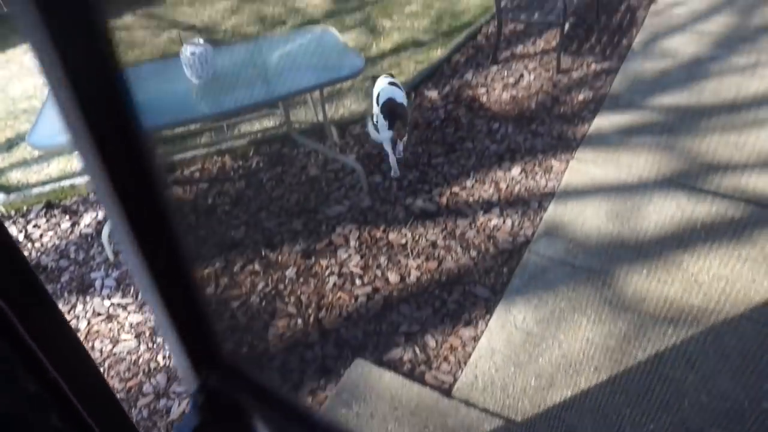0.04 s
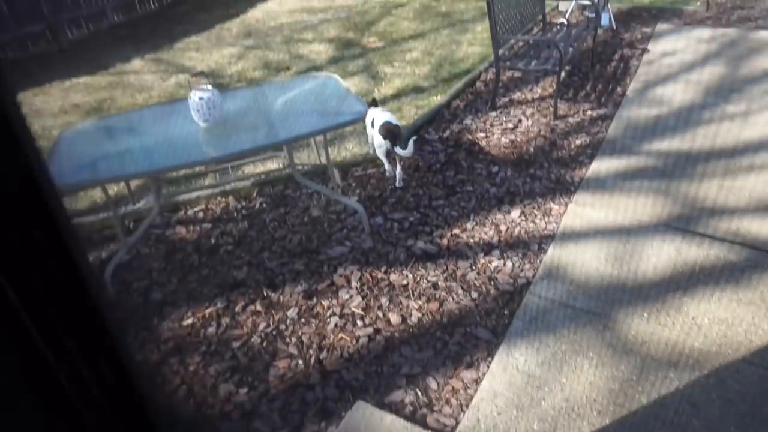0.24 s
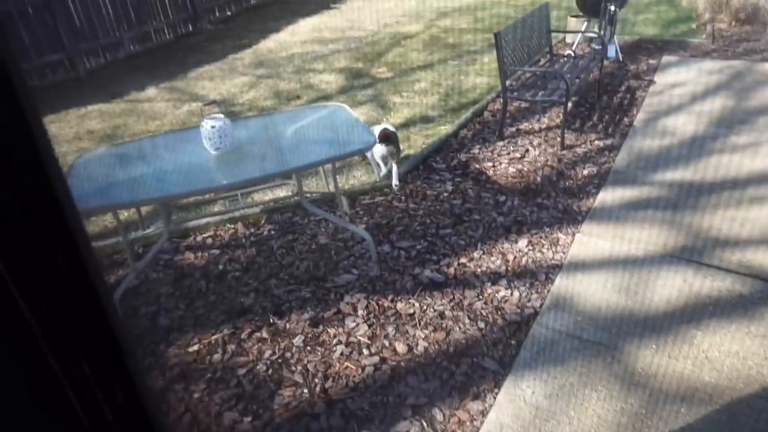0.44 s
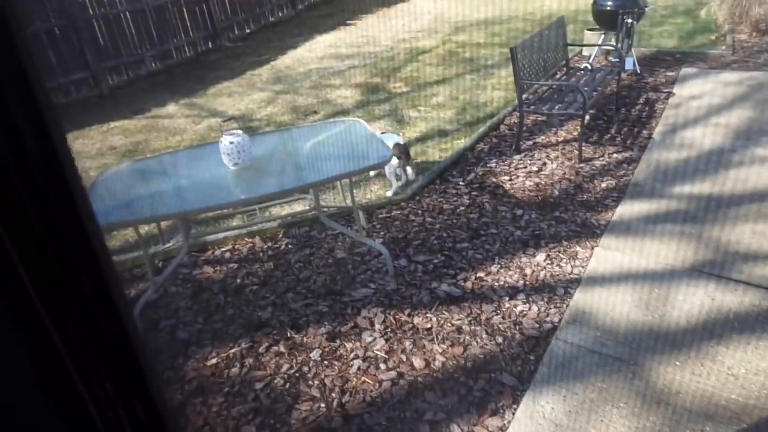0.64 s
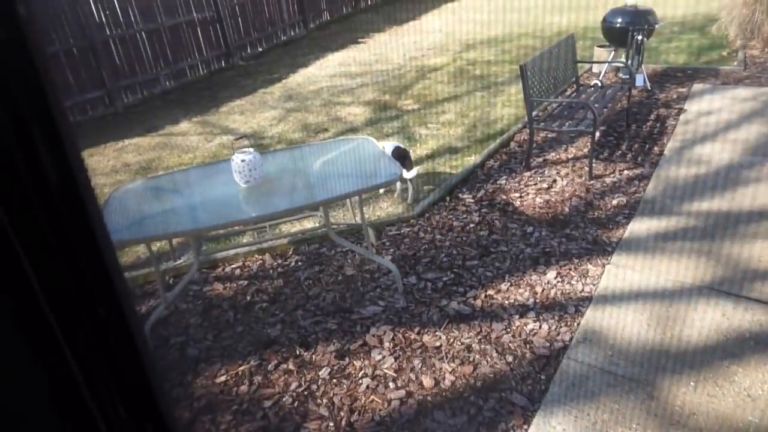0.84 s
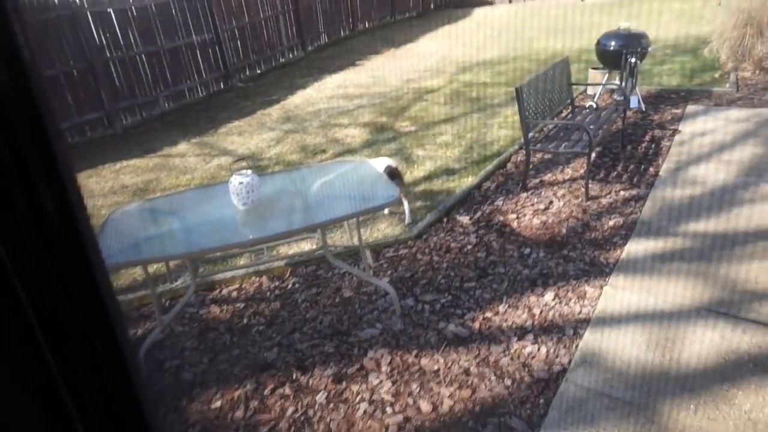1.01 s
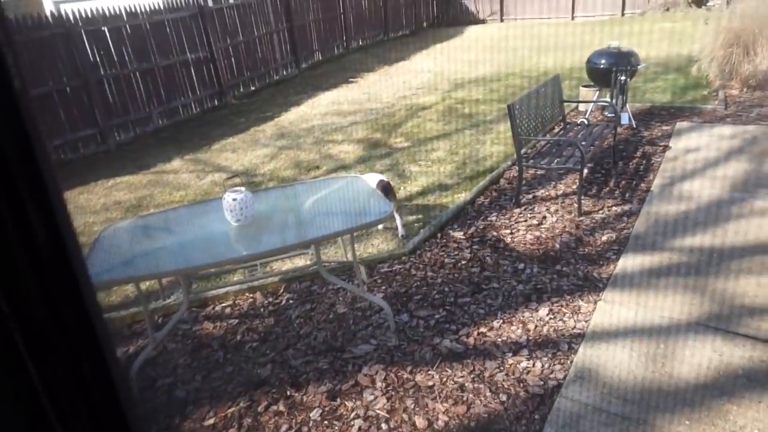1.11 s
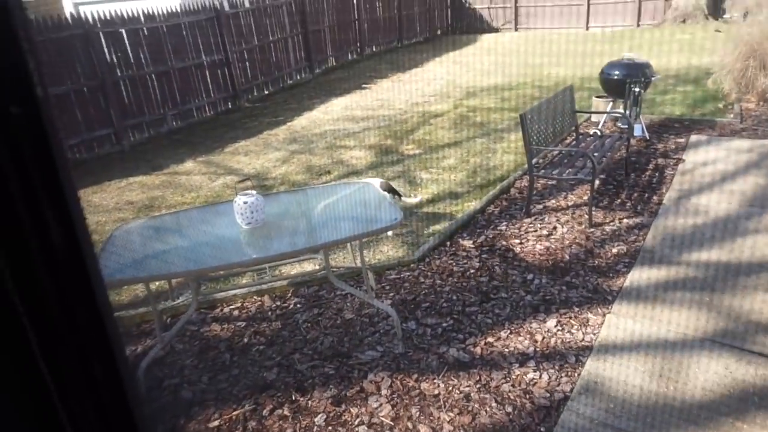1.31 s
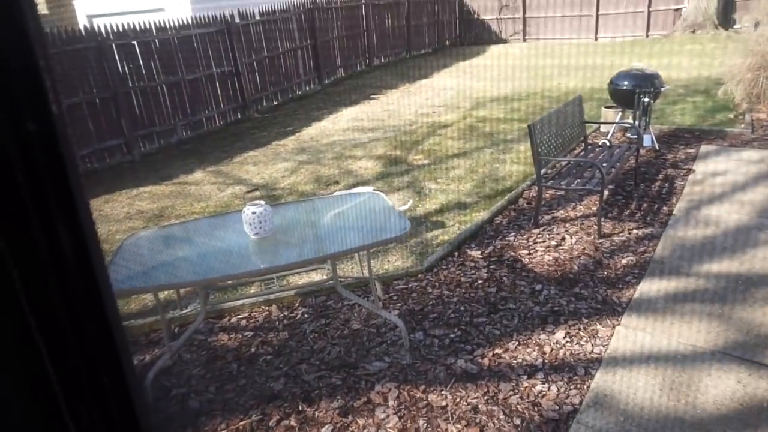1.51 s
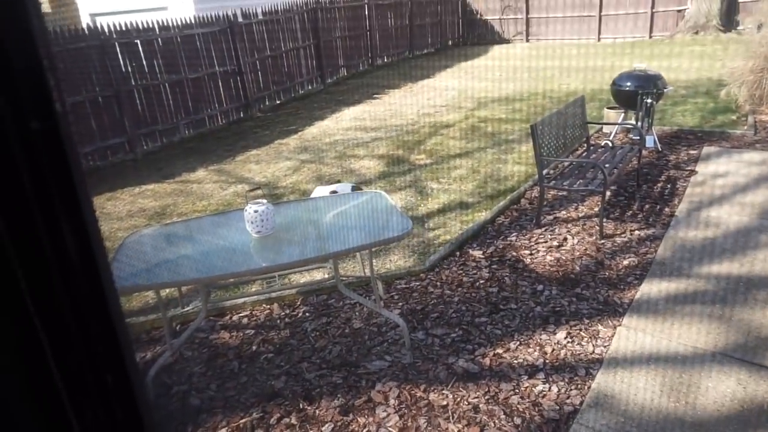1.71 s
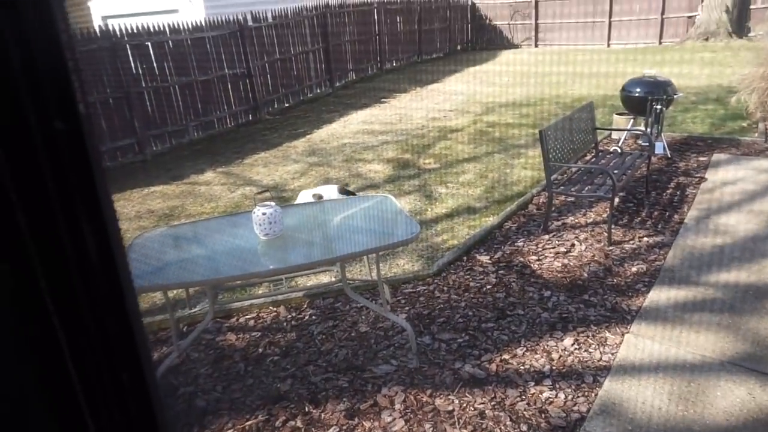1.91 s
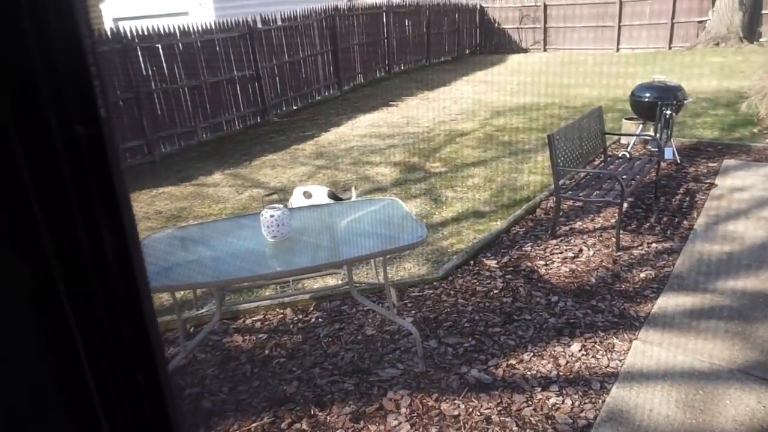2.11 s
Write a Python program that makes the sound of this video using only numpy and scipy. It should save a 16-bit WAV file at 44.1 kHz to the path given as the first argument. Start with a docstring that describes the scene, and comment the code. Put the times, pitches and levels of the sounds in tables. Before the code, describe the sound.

A screen door hisses briefly and slams shut, rattling, before small birds chirp in the yard.

```python
"""A soft bump, a hiss and the ping of a spring: a metal screen door swings shut close by. Its latch strikes and
scrapes, then the loose panel clatters against the frame, the latch seats with a knock and the door shudders
out. Each impact excites damped modes: sinusoids where they are few, decaying noise where they are dense. The
room behind rings briefly; outside, small birds chirp over the steady hum of a back yard."""
import sys
import numpy as np
from scipy import signal
from scipy.fft import rfft, irfft
from scipy.io import wavfile

SR = 44100
rng = np.random.default_rng(int(sys.argv[2]) if len(sys.argv) > 2 else 0)


def master_out(mix):
    """Clip the mix to full scale and print it as 16-bit PCM to the path in sys.argv[1]."""
    frames = np.transpose(np.atleast_2d(mix))
    ceiling = np.clip(frames, -1, 1)
    pcm = np.round(ceiling * 32767).astype(np.int16)
    wavfile.write(sys.argv[1], SR, pcm)


N = 94815
T = np.arange(N) / SR

# How unlike the two channels are. Each row: frequency in Hz, side minus mid in dB.
STEREO_WIDTH = [(60, -36.5), (200, -20.5), (380, -13), (700, -13), (1300, -3.5), (2400, -3), (4400, 2),
                (8000, 1), (15000, -6)]
# Spectrum of sliding friction. Each row: frequency in Hz, density in dB.
FRICTION_SPECTRUM = [(200, 2.5), (1200, 0.5), (3600, 1), (5500, -11), (6650, -6), (8200, -13), (9700, -6),
                     (11500, -11), (13100, -1), (14500, -12), (16000, -21)]
# Spectrum of diffuse reflections. Each row: frequency in Hz, density in dB.
ECHO_SPECTRUM = [(60, 7.5), (170, 7.5), (500, 5.5), (1500, 0.5), (3000, 0), (6000, -7), (7600, 5),
                 (9000, -3.5), (16000, 0)]


def amp(db):
    """Amplitude ratio of a level in decibels."""
    return 10 ** (np.asarray(db) / 20)


def at(points, hz):
    """Interpolation of (Hz, value) points on a logarithmic frequency axis."""
    p = np.array(points, float)
    return np.interp(np.log(np.maximum(hz, 1)), np.log(p[:, 0]), p[:, 1])


def rise(seconds):
    """Linear attack to full amplitude."""
    return np.minimum(T[:16384] / seconds, 1)


def fade(t60, size=16384):
    """Damping: exponential decay, 60 dB down after t60 seconds."""
    return amp(-60 * T[:size] / t60)


def focus(hz, centre_hz, octave_db=-3):
    """Selective excitation: gain falls by octave_db one octave from the centre and is flat beyond two."""
    if centre_hz is None:
        return 1
    octaves = np.log2(np.maximum(hz, 1) / centre_hz)
    return amp(octave_db * np.minimum(octaves ** 2, 4))


def noise(spectrum, size=N, centre_hz=None):
    """Partial coherence: coloured stereo noise of rms 1, alike in the bass and unlike in the treble."""
    hz = np.fft.rfftfreq(size, 1 / SR)
    mid, side = np.exp(2j * np.pi * rng.random((2, len(hz))))
    width = amp(at(STEREO_WIDTH, hz))
    gain = amp(at(spectrum, hz)) / np.hypot(1, width) * (hz > 20) * focus(hz, centre_hz)
    y = irfft(np.array([mid + width * side, mid - width * side]) * gain, size)
    return y / y.std()


def burst(spectrum, t60, centre_hz=None):
    """Modal overlap: countless close resonances struck at once merge into decaying noise."""
    return noise(spectrum, size=16384, centre_hz=centre_hz) * fade(t60)


def ring(modes, scatter_db=0., centre_hz=None):
    """Modal superposition: damped sinusoids, the high ones out of phase between the channels."""
    y = 0
    for (hz, db, t60), (strength, side) in zip(modes, rng.standard_normal((len(modes), 2))):
        envelope = fade(t60) * amp(db + scatter_db * strength) * focus(hz, centre_hz)
        lag = np.arctan(amp(at(STEREO_WIDTH, hz))) * np.sign(side) * np.array([[1], [-1]])
        y = envelope * np.sin(2 * np.pi * hz * T[:len(envelope)] + lag) - y  # neighbours alternate in sign
    return y


def pan(y, db):
    """Level difference: the treble leans left for positive db while the bass stays in the middle."""
    bass = signal.sosfilt(signal.butter(1, 510, fs=SR, output="sos"), y)
    return bass + (y - bass) * amp(np.array([[db], [-db]]) / 2)


def add(out, start, y, pan_db=0.):
    """Superposition: a sound joins the mix at its start in seconds."""
    i = int(start * SR)
    out[:, i:i + y.shape[-1]] += pan(y, pan_db)[:, :N - i]


def echo(x, spectrum, t60, size=32768):
    """Diffuse reflection: convolution with noise that builds up quickly and decays."""
    tail = noise(spectrum, size) * fade(t60, size) * np.minimum(T[:size] / 0.0054, 1)
    tail /= np.sqrt((tail ** 2).sum() / 2)
    return signal.fftconvolve(x, tail, axes=1)[:, :N]


def yard():
    """Ambient noise: a distant hum, a faint rustle that comes and goes, and a few light ticks."""
    # Spectra of hum, rustle and tick. Each row: frequency in Hz, density in dB.
    hum_spectrum = [(15, -32), (25, -1.5), (107, 0), (169, -4.5), (289, -1), (359, -5), (389, -1.5),
                    (433, -9), (567, -7), (970, -9), (1380, -8), (1570, -17.5), (1950, -14), (3930, -26),
                    (15500, -38)]
    rustle_spectrum = [(900, -21), (1800, -1), (2400, -0.5), (3700, -1.5), (5500, -18.5), (15000, -20)]
    tick_spectrum = [(800, -5), (2000, -7), (3400, -1.5), (4500, -26), (12000, -36)]
    # Envelopes of hum and rustle, and the single ticks. Each row: time in seconds, level in dB.
    hum_levels = [(0, -42), (.2, -39.5), (.8, -42), (1.5, -42), (1.9, -41), (2.15, -41)]
    rustle_levels = [(0, -57), (.7, -58.5), (1.0, -59.5), (1.45, -62), (1.65, -53.5), (1.78, -61.5),
                     (2.0, -56.5), (2.15, -55)]
    ticks = [(1.041, -37.5), (1.8358, -36), (1.8505, -33), (2.072, -44)]
    out = noise(hum_spectrum) * amp(np.interp(T, *np.array(hum_levels).T))
    out += noise(rustle_spectrum) * amp(np.interp(T, *np.array(rustle_levels).T))
    for start, db in ticks:
        add(out, start, amp(db) * burst(tick_spectrum, t60=0.028))
    return out


def birds():
    """Frequency modulation: slightly rough whistles slur downward, and the fences reflect them."""
    # Each row: start in seconds, length in seconds, top and end pitch in Hz, level in dB,
    # bend exponent (higher holds the top note longer).
    chirps = [(1.016, 0.038, 5250, 3230, -49.5, 1.1), (1.138, 0.035, 5080, 3090, -48, 0.99),
              (1.248, 0.031, 4400, 3830, -47, 3), (1.266, .026, 5120, 4550, -49, 1.8),
              (1.279, 0.026, 4500, 3220, -43.5, 0.99), (1.888, 0.027, 5050, 4950, -53.5, 5),
              (1.915, 0.017, 4040, 3320, -52, 1.1), (2.019, .028, 4900, 4700, -54.5, 3.4),
              (2.03, 0.032, 4310, 2760, -52.5, 0.86)]
    out = np.zeros((2, N))
    for start, length, top_hz, end_hz, db, bend in chirps:
        progress = np.minimum(T[:4096] / length, 1)
        knots = np.linspace(0, 1, 30)
        waver, flutter_db = (np.interp(progress, knots, r) for r in rng.standard_normal((2, 30)))
        hz = (top_hz + (end_hz - top_hz) * progress ** bend) * (1 + 0.019 * waver)
        envelope = amp(db + flutter_db) * np.sqrt(4 * progress * (1 - progress))
        add(out, start, envelope * np.sin(2 * np.pi * np.cumsum(hz) / SR))
    return out + amp(3.5) * echo(out, ECHO_SPECTRUM, t60=0.42)


def to_the_right(outdoors):
    """Localisation: a level difference that varies with frequency puts the yard on the right."""
    # Each row: frequency in Hz, left minus right in dB.
    balance = [(100, 0), (350, -1), (700, -6), (1300, -5), (2400, -2), (4400, -4.5), (8000, 0.5),
               (15000, -1.5)]
    lean_db = at(balance, np.fft.rfftfreq(N, 1 / SR))
    return irfft(rfft(outdoors) * amp(lean_db * np.array([[1], [-1]]) / 2), N)


def reverberation(door):
    """Reverberant decay: the room rings briefly and a faint high shimmer outlasts it."""
    # Each row: frequency in Hz, density in dB.
    shimmer_spectrum = [(5500, -32), (7000, -12), (7600, 0), (8300, -7), (10000, -16), (12700, -7),
                        (15000, -20)]
    room = amp(-15.5) * echo(door, ECHO_SPECTRUM, t60=0.82)
    return room + amp(-32) * echo(door, shimmer_spectrum, t60=1.8)


def bump():
    """Low-frequency excitation: the door moves with a soft bump."""
    # Each row: frequency in Hz, density in dB.
    bump_spectrum = [(30, -25), (60, -2), (95, 1), (140, -11), (300, -13), (500, -13.5), (1500, -51)]
    out = np.zeros((2, N))
    add(out, 0.00805, amp(-37.5) * burst(bump_spectrum, t60=0.57))
    return out


def closer(end_s=0.3, release_s=0.022):
    """Broadband noise: the closer hisses while the door glides shut."""
    return amp(-51.5) * noise(FRICTION_SPECTRUM) * np.clip((end_s - T) / release_s + 1, 0, 1)


def spring(spread_hz=112):
    """Beating: the shifting spring pings in clusters of close coil modes, with a rasp."""
    # Each row: start in seconds, ring level in dB, rasp level in dB.
    pings = [(.001, -54, -44.5), (0.06, -41, -45), (.168, -54.5, -54), (1.013, -49.5, -45)]
    # Each row: frequency in Hz, level in dB, t60 in seconds.
    coil_modes = [(3480, -7.5, 0.65), (6010, 6.5, 0.14), (8020, -5, 0.24), (13400, -8, 0.36),
                  (14100, -11, .13)]
    # Each row: frequency in Hz, density in dB.
    rasp_spectrum = [(1000, 1), (3300, 1), (5000, -2), (7000, -9), (10000, -6), (13500, -3), (16000, -7)]
    out = np.zeros((2, N))
    for start, ring_db, rasp_db in pings:
        coils = 0
        for shifts in spread_hz * rng.uniform(-1.09, 1, size=(4, len(coil_modes))):
            coils += ring([(hz + shift, db, t60) for (hz, db, t60), shift in zip(coil_modes, shifts)])
        rasp = amp(rasp_db) * burst(rasp_spectrum, t60=0.3)
        add(out, start, rise(0.004) * (amp(ring_db) * coils / 2 + rasp), pan_db=-3)
    return out


def thud(hz, body_db, rise_s=0.0067):
    """Flexural vibration: the struck door bends for a few soft cycles and its low modes ring on."""
    # Each row: frequency in Hz, level in dB, t60 in seconds.
    door_modes = [(47.6, -3, 0.46), (83.8, -1.5, 0.24), (134, -18, 0.32), (168, -14, 0.18),
                  (196, -5, 0.088), (247, -8.5, .16), (324, -4.5, 0.19), (407.6, -6, 0.27)]
    age = T[:16384] / rise_s
    flex = age * np.exp(1 - age) * np.sin(2 * np.pi * hz * T[:16384])
    return flex + amp(body_db) * rise(rise_s) * ring(door_modes, scatter_db=1.5, centre_hz=hz)


def latch():
    """Impact and friction: the latch meets the strike plate with a clack and scrapes over it."""
    # Each row: start in seconds, clack level in dB, scrape level in dB, pan in dB.
    strikes = [(0.2273, -11, -29, -7.5), (.2335, -12, -15.5, 0), (0.241, -21, -43, -8),
               (.2505, -25, -24.5, 1)]
    # Each row: frequency in Hz, level in dB, t60 in seconds.
    latch_modes = [(835, -1, 0.045), (950, -13, .06), (1140, -9, 0.031), (1287, -2, 0.11),
                   (1498, -7, 0.079), (1624, -4, 0.066), (1817, 0, 0.054), (2572, -5, .08),
                   (3417, -22, 0.14)]
    # Dense ring of the latch housing. Each row: frequency in Hz, density in dB.
    housing_spectrum = [(120, -28), (250, 2.5), (500, -14), (850, 3.5), (1800, -0.5), (2200, -14),
                        (4000, -11), (8000, -33)]
    out = np.zeros((2, N))
    for start, clack_db, scrape_db, pan_db in strikes:
        metal = amp(-6) * ring(latch_modes, scatter_db=4.1) + amp(-7) * burst(housing_spectrum, t60=0.12)
        clack = amp(clack_db) * rise(0.00036) * metal
        scrape = amp(scrape_db) * rise(0.0019) * burst(FRICTION_SPECTRUM, t60=0.067)
        add(out, start, clack + scrape, pan_db)
    add(out, 0.2305, amp(-22.5) * thud(hz=176, body_db=-10))
    return out


def clatter():
    """Inelastic collisions: the panel bounces on the frame, and each contact rings, cracks and thuds."""
    # Each row: start in seconds, ring level in dB, most favoured frequency in Hz, crack level in dB,
    # thud level in dB, thud pitch in Hz, pan in dB.
    blows = [(0.3039, -18, 2340, -33, -41, 278, 2.5), (0.3292, -14, 2570, -11.5, -26, 243, -1),
             (0.3379, -12.5, 3300, -20, -22.5, 141, 2), (.3508, -12, 2880, -24.5, -30, 131, 0.5),
             (0.361, -26, 1800, -27, -35.5, 241, 0), (.3670, -14, 1800, -19.5, -23, 85, 2.5),
             (0.3771, -16.5, 2170, -23, -22.5, 246, 1), (0.384, -18.5, 2200, -34, -38, 195, 2),
             (0.4011, -10.5, 3740, -13.5, -24, 50, 1.5), (0.4083, -17.5, 2600, -27, -15.5, 199.4, 0),
             (.4160, -18.5, 1710, -41, -24, 353, -1), (0.4361, -13.5, 1900, -19.5, -21, 304, -1.5),
             (0.453, -24, 1220, -44, -26, 280, 5), (0.474, -30.5, 1200, -33, -22, 159.4, 0),
             (0.4919, -36, 1400, -52, -29.5, 250, 2), (0.5144, -30, 1370, -29.5, -24, 178.5, -2),
             (0.53, -40, 1400, -41, -42, 294, -4), (.5530, -33, 1210, -60, -30.5, 145, 0),
             (0.6, -36.5, 2000, -48, -35.5, 102, 1), (.6380, -37.5, 900, -48, -31.5, 152, 0),
             (.6620, -42.5, 927, -51, -32.5, 151.5, 2)]
    # A loose part clinks as the door settles. Each row: start in seconds, level in dB.
    clinks = [(.4752, -30.5), (0.4922, -42)]
    # Rattle of the panel and crack of a contact. Each row: frequency in Hz, density in dB.
    panel_spectrum = [(100, -6), (300, 9.5), (600, 7.5), (950, 0.5), (1300, 3), (2000, -5.5), (2700, -2.5),
                      (3300, -8.5), (3900, -3.5), (4800, -10.5), (7000, -20.5), (16000, -42)]
    crack_spectrum = [(500, -1.5), (2000, 3), (4000, 1.5), (7000, 1), (10500, -0.5), (12500, -2),
                      (14200, -5), (16000, -15)]
    # Modes of the metal frame, a glancing blow, the seating knock and the loose part.
    # Each row: frequency in Hz, level in dB, t60 in seconds.
    frame_modes = [(520, -8, 0.35), (772, -7, 0.3), (1147, -13.5, 0.37), (1230, -5, .2), (1340, 0, 0.11),
                   (1700, -18, 0.18), (1827, -2, 0.085), (1934, 3, 0.086), (2463, -9, 0.16),
                   (2710, -23, 0.24), (2965, -4.5, 0.07), (3750, -6, 0.081)]
    glance_modes = [(830, -7, 0.054), (1290, 2, 0.023), (1740, -5, 0.032), (2270, -17, 0.024),
                    (2530, 1, 0.034), (2950, -9, 0.025)]
    seat_modes = [(480, -4.5, 0.067), (603, -0.5, 0.079), (705, -3.5, 0.079), (1030, -21, 0.029),
                  (1226, -1, 0.068), (1620, -3, 0.041)]
    clink_modes = [(7350, -3, .03), (7580, 0, .05), (7950, -5, .03), (9050, -8, .02)]
    out = np.zeros((2, N))
    for start, ring_db, hz, crack_db, thud_db, thud_hz, pan_db in blows:
        rattle = burst(panel_spectrum, t60=0.074, centre_hz=hz)
        frame = amp(-13) * ring(frame_modes, scatter_db=5, centre_hz=hz)
        crack = amp(-2) * burst(crack_spectrum, t60=0.064)
        snap = amp(-9) * burst(crack_spectrum, t60=0.012)
        contact = amp(ring_db) * (rattle + frame) + amp(crack_db) * (crack + snap)
        add(out, start, rise(0.00036) * contact, pan_db)
        add(out, start, amp(thud_db) * thud(thud_hz, body_db=-8.5))
    add(out, 0.304, amp(-13) * ring(glance_modes))
    add(out, 0.4385, amp(-13) * ring(seat_modes))
    add(out, 0.338, amp(-25) * ring([(10243, 0, 0.13)]))  # a thin metal part set ringing
    for start, db in clinks:
        add(out, start, amp(db) * ring(clink_modes))
    return out


def scene():
    """Superposition of the door's direct sound, its reverberation and the yard."""
    door = latch() + clatter() + closer() + spring() + bump()
    return door + reverberation(door) + to_the_right(birds() + yard())


def record(dry, top_hz=15800):
    """Soft saturation rounds the highest peaks and a steep low-pass filter cuts the top."""
    return signal.sosfilt(signal.ellip(8, .2, 80, top_hz, fs=SR, output="sos"), np.tanh(dry))


dry = scene()
out = record(dry)
master_out(out)
```